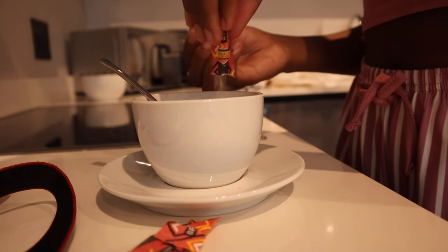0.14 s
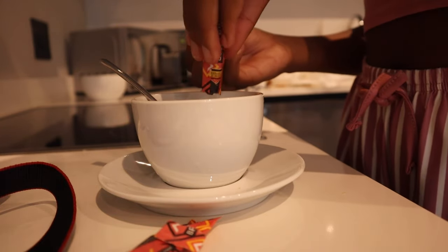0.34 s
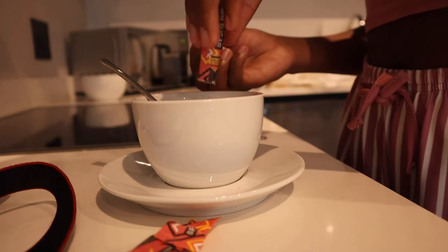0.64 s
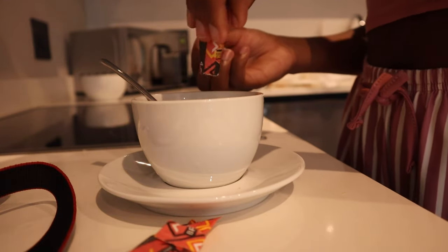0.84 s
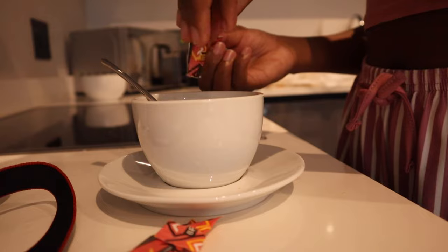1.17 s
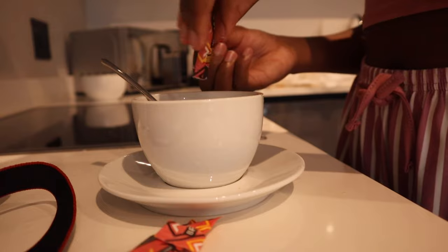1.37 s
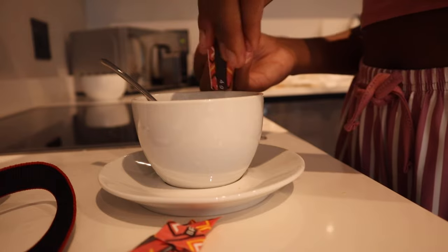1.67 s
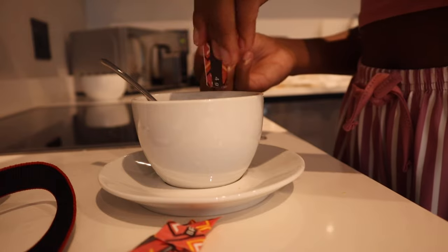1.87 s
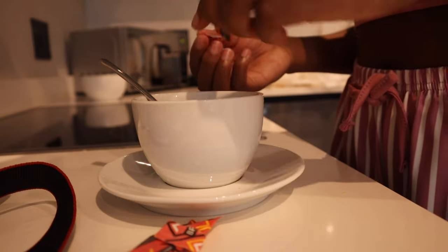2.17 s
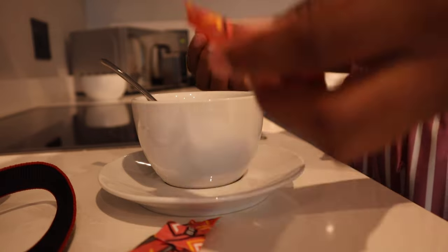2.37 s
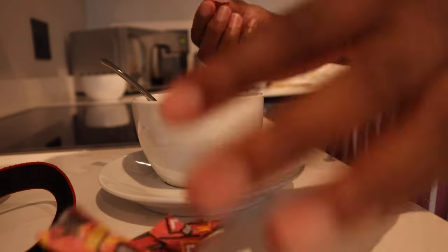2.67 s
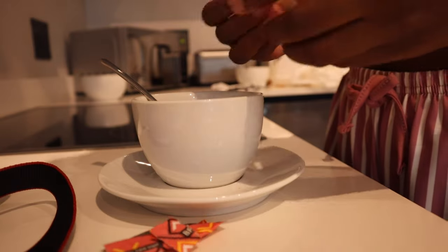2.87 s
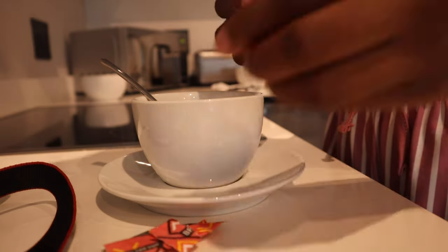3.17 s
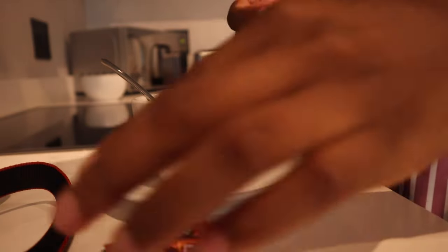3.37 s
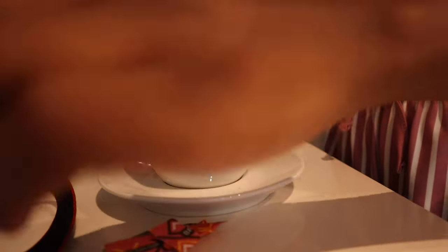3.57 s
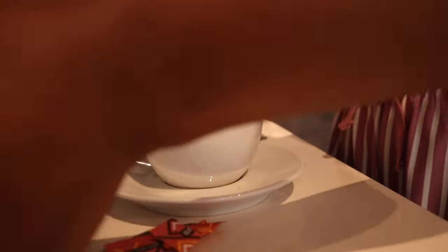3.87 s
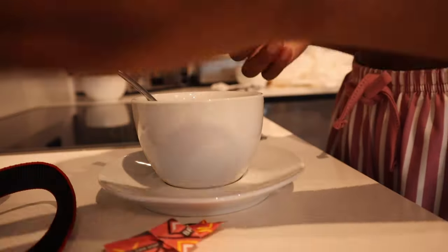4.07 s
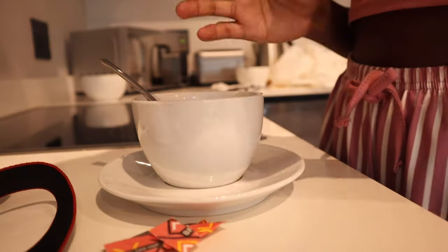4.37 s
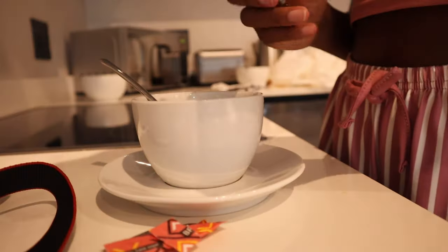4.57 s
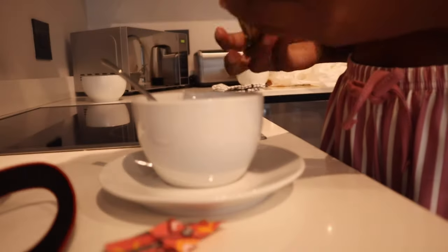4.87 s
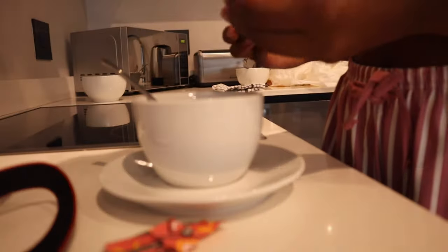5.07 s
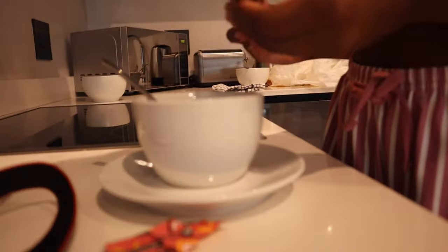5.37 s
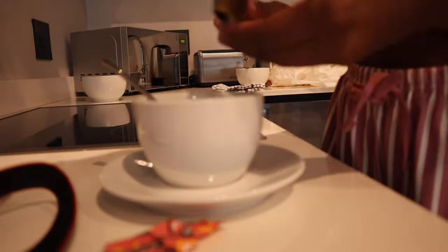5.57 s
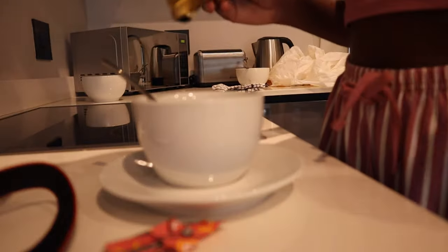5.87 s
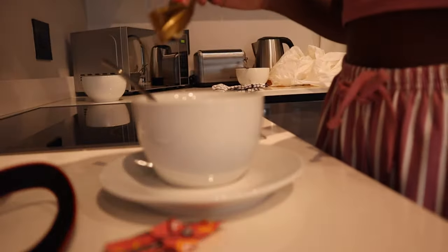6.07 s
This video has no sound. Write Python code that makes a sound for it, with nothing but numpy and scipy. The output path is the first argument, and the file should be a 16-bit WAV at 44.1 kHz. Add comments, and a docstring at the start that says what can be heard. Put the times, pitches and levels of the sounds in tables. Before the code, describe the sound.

Thin plastic film crackles between fingers, recorded close and wide. A short seam tear comes first, then irregular loud creases and fine rustle for about two seconds. A lull with faint rustling follows, broken by a few snaps, before another sachet crunches densely and dies away. Dull hand bumps, short hard-room reflections and a low appliance hum sit quietly around it.

```python
"""Fingers squeeze and crumple two plastic sachets, one after the other, in a hard-walled kitchen.
Creases in the film snap one by one: bursts of noise ring in the sachet's resonances.
Tiny random clicks make the rustle and a ripping seam; filtered bursts make soft hand knocks.
Wavering appliance tones hum under room air made of noise bands; an echo and feedback delays add the walls.
A widened stereo microphone pair close by hears it, the peaks held at full scale."""
import sys
import numpy as np
from scipy import signal
from scipy.io import wavfile

SR = 44100
rng = np.random.default_rng(int(sys.argv[2]) if len(sys.argv) > 2 else 0)


def file_out(sig):
    """Save sig as 16-bit WAV at sys.argv[1]."""
    # one column per channel
    cols = np.atleast_2d(sig).T
    # limit, then scale
    lim = np.clip(cols, -1, 1)
    pcm = np.round(lim * 32767).astype(np.int16)
    wavfile.write(sys.argv[1], SR, pcm)


def decibels_to_gain(level_db):
    """Convert a level in decibels to a linear amplitude gain (20 dB per decade)."""
    exponent = np.asarray(level_db, float) / 20
    return 10 ** exponent


N = 274737

# creases that buckle: start_s [s], level_db [dB, peak of the 1.8-6 kHz part],
# pouch_db [dB, low part against that], film_db [dB, treble part against that], pan_db [dB, left over right]
CREASE_SNAPS = [(0.0046, -34.5, -7, 7, -8), (0.042, -24, -37, 8, -3), (0.048, -18, -10, -42, 20),
                (0.0548, -3.5, -14, -8.5, -10.5), (0.068, -20.5, -7, -19, 17.5), (0.435, -33, -1, -2, -1),
                (0.468, -38.5, -1, -2, -12), (0.4872, -32.5, -8, 4, -3), (0.497, -30, -16, 2, -7),
                (0.527, -35.5, -3, 0, -2), (0.73, -24, -18, -6, -7), (0.733, 1, -14, -10.5, -4.5),
                (0.7641, -17, -6.5, -8.5, 0), (0.9115, -17, -17, -6, -4), (0.9625, -4.5, -7, 1.5, -3.5),
                (1.012, -20.5, -3, -16, 1.5), (1.0424, -8, -16.5, 8.5, -11),
                (1.0535, -19.5, -6, -17.5, 5.5), (1.0634, -8, -11, -5, -12), (1.1608, -19, -6.5, 2, 7),
                (1.1782, -10.5, -13.5, -5.5, -14), (1.1997, -7.5, -11, -4.5, 3), (1.2374, -31, 10, -23, -7),
                (1.25, -13, -5.5, -33, -2), (1.3902, -22, -4, -10, -24), (1.3981, -8, -13.5, -1, 7.5),
                (1.401, -10.5, -12.5, -25, -4), (1.4256, -19.5, -21, -14, -8), (1.4753, -6, -16, 0, -2),
                (1.4912, -15, -12.5, 3, -3), (1.5142, -12, -8, -28, -13), (1.6104, -5, -9.5, -11, -2.5),
                (1.6215, -10.5, -25, -6, 38), (1.689, -8.5, -4, 4.5, -3), (1.7003, -6, -39, -3, -0.5),
                (1.8255, -12.5, -10.5, -19, -4), (1.8268, -13, -7, -9, -1), (1.8565, -14.5, -40, 2.5, -1),
                (1.861, -9, -10, -14, -2), (1.9019, -11.5, -10, -34, -6.5), (1.9228, -14.5, -13, -4, -2),
                (2.0341, -20.5, 1.5, -11, -7), (2.038, -12, -11, -14, 3), (2.051, -15, -8.5, -2, -6.5),
                (2.076, -25.5, -10, 2, 2), (2.1647, -30, -11, 24, -1), (2.442, -35, -12, 1, 0),
                (2.456, -38.5, -14, 7, 0), (2.6675, -20, -4, -10, -5), (2.6927, -5.5, -9.5, -5, -7),
                (2.7181, -22.5, -10, 0, 4), (2.752, -26, -15, -8, 2), (2.7694, -24, -11, -11, 10),
                (2.7849, -24, -20, -17, -1), (2.804, -24.5, 0.5, -21, 4), (2.8738, -12, -9, -19, 2),
                (2.9228, -32.5, 5.5, -26, 6), (3.4299, -25, -0.5, 0.5, -3), (3.882, -33, -7, 4.5, 1),
                (3.89, -27, -8.5, -8, 13.5), (3.903, -32.5, -7.5, -15, 4), (3.948, -17.5, -10.5, -6.5, 5),
                (3.9986, -42, -14.5, 13, 1), (4.017, -30, -5, -23, 0), (4.0729, -23, -15, 10, 5.5),
                (4.104, -20, -3, -0.5, 20), (4.1651, -20.5, -3, -31.5, 3), (4.1784, -15, -30, -27, 0.5),
                (4.1845, -15.5, -20.5, -24, 11.5), (4.1952, -22, -4, -17, 3), (4.2127, -14, -41, -14, -4.5),
                (4.2938, -13, -8, 4.5, 4), (4.3316, -5.5, -32, -4.5, 5), (4.3544, -7, -8.5, -6, -6),
                (4.3755, -11, -15, 12.5, 5), (4.429, -10, -22, 5, -6), (4.4365, -4, -35, -18, 0.5),
                (4.4403, -7, -12, 9, -4.5), (4.447, -13.5, -35, -5, -1), (4.5953, -25.5, 4, 16.5, -2),
                (4.6188, -9, -38, 5.5, -0.5), (4.6367, -13.5, -23, 13, -8), (4.6399, -6.5, -10.5, -4, 16.5),
                (4.6847, -15.5, -12.5, -17, 3), (4.7373, -20.5, -16, -5, -5), (4.8459, -1.5, -36, 1, -1),
                (4.8804, -1.5, -11.5, -2.5, -4), (4.8947, -16.5, -26, -18, -6), (4.946, -20, -24, 5.5, -5),
                (4.952, -5.5, -33, -29, 0), (4.92, -23.5, -23, -21, -3), (5.0343, -26, -10, -17, -3),
                (5.0383, -24, -25, -20, -4), (5.0549, -17.5, -49, -18, 20), (5.0614, -27.5, 10.5, 9, 5),
                (5.0674, -22, -39, 5.5, -20), (5.085, -25, 8, 0, 3), (5.2, -36.5, 6, -24, -6),
                (5.4167, -13.5, -33, -8, -8), (5.423, -8.5, -44, 2.5, -2), (5.429, -10.5, -43, -5, 10),
                (5.4586, -16, -35, -16, -6), (5.477, -10, -34, -6, 3), (5.543, -23.5, -24, -17, -4),
                (5.5546, -18.5, -3, -1.5, -1), (5.5764, -14, -39, 4.5, -6.5), (5.584, -20, -4, 1.5, 18),
                (5.7858, -22, -41, -1, -1)]
# resonances of each sachet as held in the hand: pitch_hz [Hz], width_hz [Hz], strength_db [dB, relative]
FIRST_MODES = [(585, 62, -2.5), (1248, 87, 5), (2418, 420, -4), (3020, 306, 2.5), (4205, 515, -2.5),
               (5300, 300, 0), (8350, 520, -11), (9160, 90, -4), (10500, 590, -15.5)]
SECOND_MODES = [(536, 51, 11), (1414, 102, 6.5), (1790, 353, 0.5), (2980, 630, 5), (4170, 1200, -10),
                (5760, 120, 0), (6900, 1800, -21), (8600, 900, -2), (10500, 600, -24.5)]
SWAP_S = 2.6   # from here on the second sachet is held
# fingers sliding over the film: start_s [s], rustle_db [dB], film_db [dB, treble part against the rustle]
FINGER_SLIDE = [(0, -48, -5), (.42, -54.5, -4), (.51, -48, -10), (.66, -66, -16), (.8, -44, -33),
                (1.15, -42, -1), (1.35, -52.5, -23), (1.9, -43.5, -9), (2.22, -55.5, 7.5),
                (2.41, -42.5, -2), (2.45, -51.5, -3), (2.51, -43, -5), (2.56, -56.5, 4), (2.65, -59.5, -1),
                (2.7, -43, 14.5), (2.81, -44, -14), (2.86, -52, -20), (2.93, -47.5, -27),
                (3.03, -61.5, 8.5), (3.3, -57, 6), (3.48, -55.5, 1), (3.8, -61.5, -28), (4.2, -45, -13),
                (4.55, -48.5, 2), (5.1, -40, -40), (5.35, -60, 11), (5.5, -39, -18.5), (5.62, -41, -4),
                (5.85, -57.5, -2), (6.23, -60, 4)]


def rms_one(x):
    """Scale to rms 1."""
    return x / np.sqrt(np.mean(x ** 2) + 1e-20)


def peak_one(x):
    """Scale each stereo event so that its loudest moment, averaged over both sides, reaches 1."""
    return x / np.sqrt(np.mean(x ** 2, axis=1, keepdims=True)).max(axis=2, keepdims=True)


def in_time(rows):
    """Turn the columns after the time into curves with one value a sample."""
    s, *columns = np.transpose(rows)
    return [np.interp(np.arange(N) / SR, s, c) for c in columns]


def at_hz(points, hz):
    """Read a spectrum on a log-frequency axis."""
    points_hz, values = np.transpose(points)
    return np.interp(np.log(hz), np.log(points_hz), values)


def drift(rate_hz):
    """Smooth random wandering around 0 with rms 1: noise through two equal low-pass poles."""
    step = 40   # samples between the points of the slow curve
    r = np.exp(-2 * np.pi * rate_hz * step / SR)
    noise = rng.standard_normal(N // step + 4002)
    slow = signal.lfilter([1], [1, -2 * r, r * r], noise)[4000:]   # skip the filter's start
    return np.interp(np.arange(N) / step, np.arange(len(slow)), rms_one(slow - slow.mean()))


def cut(x, hz, kind, order=2):
    """Butterworth filter along time."""
    return signal.sosfilt(signal.butter(order, hz, kind, fs=SR, output="sos"), x)


def resonance(x, hz, width_hz):
    """Two-pole resonance, gain about 1 at its top: a narrower width rings longer."""
    r = np.exp(-np.pi * width_hz / SR)
    poles = [1, -2 * r * np.cos(2 * np.pi * hz / SR), r * r]
    return signal.lfilter([(1 - r * r) / 2, 0, (r * r - 1) / 2], poles, x)


def opposed_treble(x, hz):
    """First-order allpass: in phase in the bass, turning to opposite phase in the treble."""
    tangent = np.tan(np.pi * hz / SR)
    a = (tangent - 1) / (tangent + 1)
    return signal.lfilter([a, 1], [1, a], x)


def hum(waver_db=2.0):
    """Low appliance tones: sines that waver in pitch and level."""
    # tones: pitch_hz [Hz], level_db [dB rms before the level wavers], waver_hz [Hz, rms pitch waver]
    tones = [(39.7, -52, 3.9), (120.4, -55.5, 3.96), (168.6, -58, 5.83)]
    out = np.zeros(N)
    for hz, db, waver_hz in tones:
        level = np.sqrt(2) * decibels_to_gain(db + waver_db * drift(22.0))
        pitch_hz = hz + waver_hz * drift(5.52)
        out += level * np.sin(2 * np.pi * np.cumsum(pitch_hz) / SR)
    return out


def air(level_db=-46, patchy_db=-0.62):
    """Room air: half-octave bands of stereo noise, alike in the bass and opposed in the treble."""
    # colour of the air: pitch_hz [Hz], density_db [dB per Hz, relative]
    colour = [(15, -30), (25, -4.5), (125, -5.5), (224, -4.5), (286, -7), (326, -10.5), (373, -14),
              (427, -10), (1060, -17.5), (1390, -16.5), (7890, -33.5), (11800, -28), (15000, -72)]
    # left-right likeness: pitch_hz [Hz], likeness [1 = same, 0 = unrelated, -1 = opposite]
    likeness = [(60, 0.99), (180, 0.86), (550, -0.054), (1650, -0.58), (4970, -0.7), (15000, -0.29)]
    out, edges = 0, 45 * 2 ** np.arange(0, 8.6, .5)
    white = rng.standard_normal((2, 2, N + 8000))
    for k, (low, high) in enumerate(zip(edges, edges[1:])):
        mid, side = cut(white[k % 2], [low, high], "band")[:, 8000:]   # neighbours use different noise
        hz = np.sqrt(low * high)
        alike = at_hz(likeness, hz)
        gain = decibels_to_gain(at_hz(colour, hz) + patchy_db * drift(6.1))
        out = out + gain * (np.sqrt(1 + alike) * mid + np.sqrt(1 - alike) * side * [[1], [-1]])
    return decibels_to_gain(level_db) * rms_one(out)


def handling(settle_db=-33.5, settle_s=0.076):
    """Power of the rustle from sliding, tearing and the bent film relaxing after each snap."""
    # the seam rips: start_s [s], level_db [dB]
    tear_levels = [(.015, -48), (.06, -27), (.1, -35.5), (.2, -32), (.25, -34), (.31, -31.5), (.345, -48),
                   (.4, -75)]
    s, snap_db = np.transpose(CREASE_SNAPS)[:2]
    kicks = np.zeros(N)
    kicks[(s * SR).astype(int)] = decibels_to_gain(snap_db + settle_db) ** 2
    # the 2 makes power fade twice as fast as amplitude
    settle = signal.lfilter([1], [1, -np.exp(-2 / (settle_s * SR))], kicks + 1e-18)
    return decibels_to_gain(in_time(FINGER_SLIDE)[0]) ** 2, decibels_to_gain(in_time(tear_levels)[0]) ** 2, settle


def rustle(per_s=7000, size_db=3.5, clump_db=2.5, broad_db=-12, tear_film_db=0, settle_film_db=-13.5):
    """Dense tiny clicks in clumps, ringing in whichever sachet is held."""
    slide, tear, settle = handling()
    power = slide + tear + settle
    steady = tear / power   # the rip is an even rasp, the rest comes in clumps
    clump = clump_db * (1 - 0.6 * steady) * drift(51)
    sizes = decibels_to_gain(size_db * np.minimum(rng.exponential(1, (2, N)), 5) + clump)
    clicks = sizes * rng.standard_normal((2, N)) * (rng.random((2, N)) < per_s / SR)
    clicks = clicks - 0.2 * clicks[::-1]   # the widened pair hears diffuse sound partly in opposite phase
    first = np.arange(N) < SWAP_S * SR
    rung = decibels_to_gain(broad_db) * clicks
    for held, modes in ((first, FIRST_MODES), (~first, SECOND_MODES)):
        for k, (hz, width_hz, db) in enumerate(modes):
            rung += (-1) ** k * decibels_to_gain(db) * resonance(clicks * held + 1e-18, hz, width_hz)
    body = cut(rung, [1000, 6500], "band")
    wide = rung - 0.2 * rung[::-1]   # the treble is opposed further
    film = cut(cut(wide, 3900, "high"), 11250, "low", order=4)
    slide_film = slide * decibels_to_gain(in_time(FINGER_SLIDE)[1]) ** 2
    film_power = slide_film + tear * decibels_to_gain(tear_film_db) ** 2 + settle * decibels_to_gain(settle_film_db) ** 2
    return np.sqrt(power) * rms_one(body) + np.sqrt(film_power) * rms_one(film)


def thumps(push_s=0.0047, width_hz=80, puff_db=-12):
    """Soft knocks of hand on worktop or pack: a push rings one dull resonance, with a puff of noise."""
    # knocks: start_s [s], peak_db [dB], pitch_hz [Hz]
    knocks = [(0.964, -25, 516), (2.794, -27.5, 870), (2.687, -23, 720), (3.822, -29.5, 348),
              (3.823, -35.5, 764), (4.099, -26, 258), (4.18, -27, 518), (4.619, -31, 482),
              (5.559, -25, 284), (5.582, -30, 330)]
    size = 2048
    out, t = np.zeros(N), np.arange(size) / SR
    for (s, db, hz), noise in zip(knocks, rng.standard_normal((len(knocks), size))):
        push = noise * t * np.exp(-t / push_s)
        knock = resonance(push, hz, width_hz) + decibels_to_gain(puff_db) * cut(push, [150, 900], "band")
        start = int(s * SR)
        out[start:start + size] += decibels_to_gain(db) * knock / np.abs(knock).max()
    return out


def small_creases(count=70):
    """Faint creases buckle at random, more often and louder where the film is handled harder."""
    over_db, spread_db = 5.5, 2.5   # peak over the rustle, and its scatter
    pouch_db, film_db, colour_db, pan_db = -8, -4.5, 3.5, 0.5   # mean parts, their scatter, side scatter
    slide, _, settle = handling()
    level = np.sqrt(slide + settle)
    when, (size, pouch, film, pan) = rng.random(count), rng.standard_normal((4, count))
    at = np.searchsorted(np.cumsum(level) / level.sum(), when).clip(0, N - 1)
    peak_db = 20 * np.log10(level[at]) + over_db + spread_db * size
    return np.transpose([at / SR, peak_db, pouch_db + colour_db * pouch,
                         film_db + colour_db * film, pan_db * pan])


def snaps(crack_s=0.00047, shiver_s=0.0063, shiver_db=-17, alike=0.47, broad_db=-4, turn_hz=8000, kick=2.7):
    """Each crease lets go in a short crack and a gritty shiver, ringing the sachet's modes in new strengths."""
    s, peak_db, pouch_db, film_db, pan_db = np.transpose(np.vstack([CREASE_SNAPS, small_creases()]))
    size = 2048
    t = np.arange(size) / SR
    noise = rng.standard_normal((len(s), 4, size))   # shared, left, right and grit noise
    strength = decibels_to_gain(2.5 * rng.standard_normal((len(s), 9)))   # each mode varies by 2.5 dB
    noise[:, 0, 3] = kick * np.sign(noise[:, 0, 3])   # the first let-go is one sharp step, flat in colour
    pair = np.sqrt(alike) * noise[:, :1] + np.sqrt(1 - alike) * noise[:, 1:3]
    pair[:, 1] = opposed_treble(pair[:, 1], turn_hz)   # the widened pair hears the treble in opposite phase
    grit = decibels_to_gain(13.0 * cut(noise[:, 3:], 860, "low"))   # the shiver comes in uneven grains
    crack = np.exp(-t / crack_s)
    shiver = decibels_to_gain(shiver_db) * grit * np.exp(-t / shiver_s)
    burst = pair * (crack + shiver)
    rung = decibels_to_gain(broad_db) * burst
    for group, modes in ((s < SWAP_S, FIRST_MODES), (s >= SWAP_S, SECOND_MODES)):
        for k, (hz, width_hz, db) in enumerate(modes):
            gain = (-1) ** k * decibels_to_gain(db) * strength[group, k, None, None]
            rung[group] += gain * resonance(burst[group], hz, width_hz)
    pouch = peak_one(cut(rung, [850, 1900], "band")) * decibels_to_gain(pouch_db)[:, None, None]
    middle = peak_one(cut(rung, [1800, 6000], "band"))
    treble = cut(cut(rung, 6870, "high"), 10320, "low", order=4)
    film = peak_one(treble) * decibels_to_gain(film_db)[:, None, None]
    gains = decibels_to_gain(peak_db[:, None] + np.outer(pan_db, [.5, -.5]))   # left, right
    out = np.zeros((2, N + size))
    for at, sound in zip((s * SR).astype(int), (pouch + middle + film) * gains[:, :, None]):
        out[:, at:at + size] += sound
    return out[:, :N]


def wall_echo(x, echo_s=.0105, echo_db=-18):
    """First reflection off the nearest wall: one late, quieter copy, sides swapped."""
    lag = int(echo_s * SR)
    return decibels_to_gain(echo_db) * np.pad(x[::-1], ((0, 0), (lag, 0)))[:, :N]


def kitchen(x, t60_s=0.37, wall_cut_hz=9600):
    """Hard-walled room: eight feedback delays a side, duller on every round, stepped block by block."""
    out, dull = np.zeros((2, N)), np.exp(-2 * np.pi * wall_cut_hz / SR)
    for k, lag in enumerate((rng.uniform(.008, .035, 16) * SR).astype(int)):
        source = x[k // 2 % 2]
        loop, state = source + 1e-18, [0.]
        gain = decibels_to_gain(-60 * lag / SR / t60_s)   # loss in one round
        for i in range(lag, N, lag):
            back, state = signal.lfilter([gain * (1 - dull)], [1, -dull], loop[i - lag:i], zi=state)
            loop[i:i + lag] += back[:N - i]
        out[k % 2] += (loop - source) * (-1) ** (k // 4)
    # the treble crosses to the other side in opposite phase
    out = out - 0.53 * cut(out[::-1], 1500, "high")
    return out - 0.6 * cut(out[::-1], 4500, "high")


def scene():
    """Hands and sachets in the room, over air and hum."""
    hands = snaps() + thumps()
    room = wall_echo(hands) + decibels_to_gain(-20) * kitchen(hands)
    return hands + room + rustle() + air() + hum()


def low_pass(x):
    """Removes everything above the highest recorded frequency."""
    return signal.sosfilt(signal.butter(12, 17010, fs=SR, output="sos"), x)


def record(dry):
    """Peaks clip at full scale, then the top rolls off."""
    clipped = np.clip(dry, -1, 1)
    finished = cut(clipped, 12340, "low", order=4)
    return low_pass(finished)


dry = scene()
out = record(dry)
file_out(out)
```